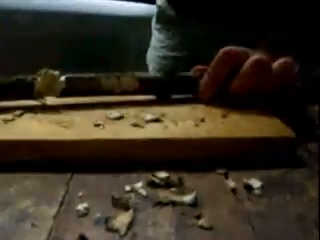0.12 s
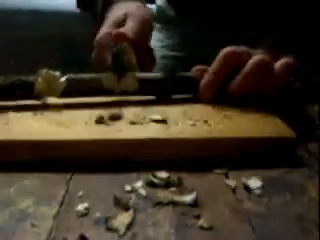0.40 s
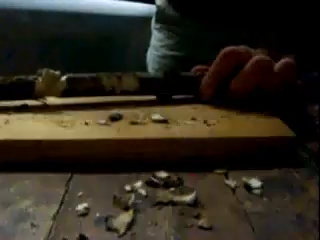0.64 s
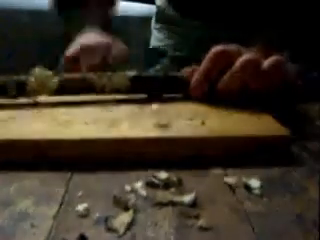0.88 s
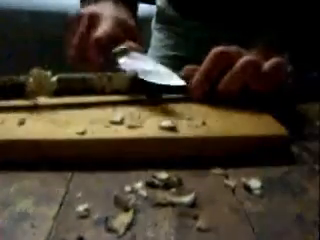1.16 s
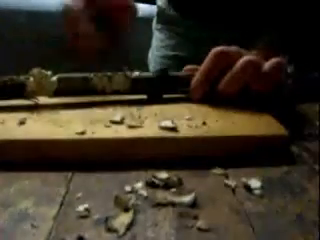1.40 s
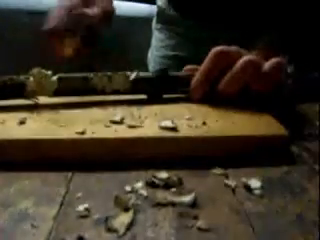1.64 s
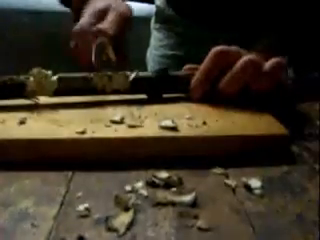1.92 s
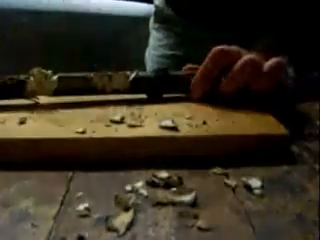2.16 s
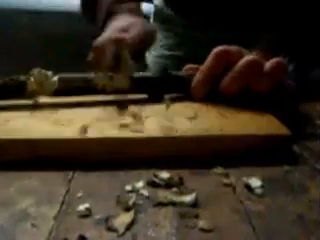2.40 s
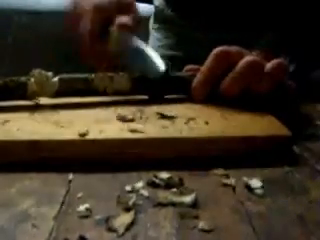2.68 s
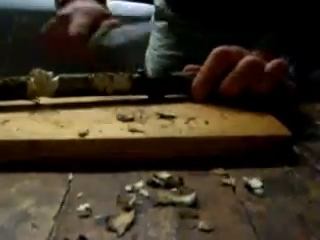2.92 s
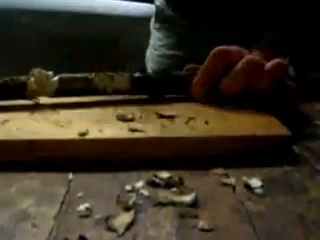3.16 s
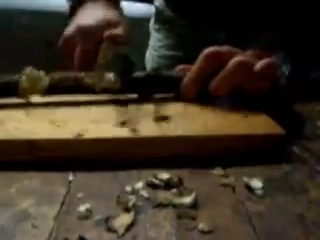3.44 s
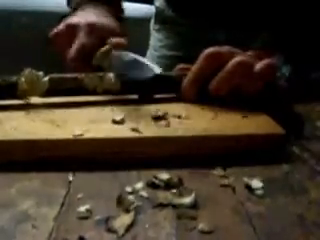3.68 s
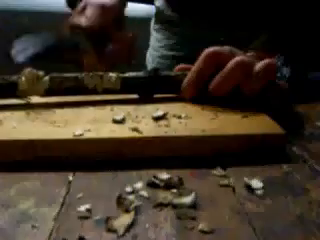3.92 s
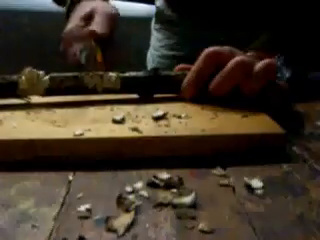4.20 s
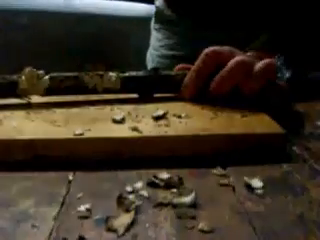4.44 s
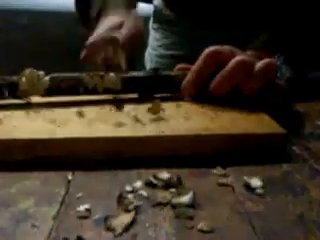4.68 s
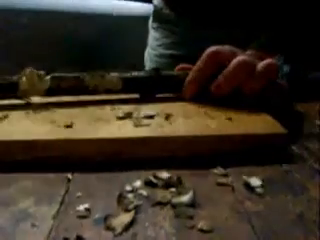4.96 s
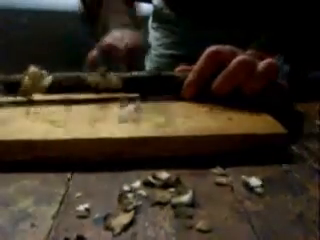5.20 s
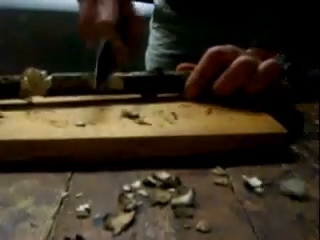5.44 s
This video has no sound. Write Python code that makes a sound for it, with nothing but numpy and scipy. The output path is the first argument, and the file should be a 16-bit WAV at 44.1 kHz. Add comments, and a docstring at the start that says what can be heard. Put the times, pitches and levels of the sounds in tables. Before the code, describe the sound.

Close to a small, cheap microphone in a bare echoing shed, a knife chops a branch held on a plank. Six hard blows crack, splinter, rattle and boom, distorting the input. Two come in the first second, then a pause, and the rest follow at uneven gaps. Lighter taps, rebounding wood and tiny chips fill in between, over hiss and soft low electrical bumps.

```python
"""In a bare, echoing shed, a knife chops into a branch held on a plank, close to a small camera.
Hard chops crack, rattle and boom, made of shaped noise and ringing wood; they overload the input.
Light taps, rebounds of the branch and landing chips follow: ringing wood with soft or bright noise.
The camera adds hiss with a faint tone, and short, low electrical dips, often a tenth of a second apart."""
import sys
import numpy as np
from scipy import signal
from scipy.fft import rfft, irfft, next_fast_len
from scipy.io import wavfile
from scipy.ndimage import map_coordinates

SR = 44100
rng = np.random.default_rng(int(sys.argv[2]) if len(sys.argv) > 2 else 0)


def materialize(psi):
    """Save the field psi as 16-bit PCM at rate SR to the path in sys.argv[1].

    A 1-D psi becomes a single channel; in a 2-D psi each row is a channel.
    """
    bounded = np.clip(np.atleast_2d(psi).T, -1, 1)
    quanta = np.round(bounded * 32767).astype(np.int16)
    wavfile.write(sys.argv[1], SR, quanta)


def elevation(decibels):
    """Turn decibel levels (scalar or array-like) into linear amplitude ratios."""
    levels = np.asarray(decibels, float)
    return 10 ** (levels / 20)


N = 246078  # length [samples]


def unit(x):
    """Scale to rms 1."""
    return x / np.sqrt(np.mean(x ** 2) + 1e-20)


def along(points, hz):
    """Read a value between (Hz, value) points on a log frequency axis."""
    f, v = np.transpose(points)
    return np.interp(np.log(hz + 1), np.log(f + 1), v)


def filtered(x, response):
    """Multiply the spectrum of x by a response, a function of frequency."""
    m = 2 * next_fast_len(len(x) // 2 + SR // 4)
    return irfft(rfft(x, m) * response(np.fft.rfftfreq(m, 1 / SR)), m)[:len(x)]


def causal(response):
    """Keep the same gains, with the phase that lets nothing come early."""
    def shaped(hz):
        cepstrum = irfft(np.log(np.maximum(response(hz), 1e-6)))
        half = len(cepstrum) // 2
        # fold the part before time zero onto the part after it
        cepstrum[1:half] *= 2
        cepstrum[half + 1:] = 0
        return np.exp(rfft(cepstrum, 2 * len(hz) - 2))
    return shaped


def add(track, s, sound):
    """Mix a sound in at s seconds; the track starts one second early."""
    part = track[round((s + 1) * SR):][:len(sound)]
    part += sound[:len(part)]


def chops():
    """The blade splits fibres with a crack, the branch rattles on the plank, the floorboards boom."""
    # hard chops: (time [s], crack level [dB], splinters above the crack [dB], thud level [dB],
    # time for the rattle to fade by 60 dB [s])
    hard_chops = [(-.33, 9.5, 0, 8, .17), (.3220, 10.5, 8.5, 6.5, .11), (0.9604, 11.5, 2.5, 8, .32),
                  (2.4414, 10.5, 3.5, 5, .12), (3.4668, 9.5, 5.5, 5, .13), (4.7250, 10, -10, 7, .15),
                  (5.2921, 11.5, 4.5, 6, .2)]
    # tone colour of splitting wood: (frequency [Hz], relative level [dB])
    crack_colour = [(59, -35.5), (100, -3.5), (415, -4.5), (495, -0.5), (956, 1), (1270, -1.5),
                    (2880, -0.5), (4650, -5), (5860, -12), (7000, -22.5), (9100, -63.5), (15400, -120)]
    push_s, push_db = 0.0011, 4.5
    splinter_hz, splinter_width_hz, splinter_t60_s = 5600, 1500, 0.053
    track, t = np.zeros(N + SR), np.arange(SR // 2) / SR
    colour = lambda hz: elevation(along(crack_colour, hz))
    splinter_colour = lambda hz: 1 / (1 + ((hz - splinter_hz) / splinter_width_hz) ** 2)
    for s, crack_db, splinter_db, thud_db, rattle_t60_s in hard_chops:
        plank_db = crack_db + 7
        # a single sharp snap, heard mostly through the room
        snap = filtered(t == 0, causal(colour))
        snap = elevation(crack_db + 31.5) * snap / np.linalg.norm(snap)
        add(track, s, shed(snap, near_db=-4.0, far_db=-20, direct_db=-21.5, hang=2))
        # tearing noise: a quick crack and a weaker, slower rattle
        noise = unit(filtered(rng.standard_normal(len(t)), colour))
        lumps = elevation(9.1 * map_coordinates(rng.standard_normal(70), [t * 130]))  # fibres give way unevenly
        fade = elevation(-60 * t / 0.022) + 0.2 * elevation(-60 * t / rattle_t60_s)
        add(track, s, elevation(crack_db) * lumps * noise * fade)
        # the blade's arrival: one short pressure push before the wood gives way
        add(track, s - push_s, elevation(push_db) * np.sin(np.pi * np.clip(t / push_s, 0, 1)))
        # the first fibres snap brightly
        bright = unit(filtered(rng.standard_normal(len(t)), splinter_colour))
        add(track, s, elevation(crack_db + splinter_db - 60 * t / splinter_t60_s) * bright)
        wood = elevation(plank_db) * ring(t, favoured_hz=600, damping=0.72, breadth=9.0)
        add(track, s, shed(wood, near_db=-6.5, far_db=-23, direct_db=-7, hang=2))
        for late, luck in rng.random((4, 2)):  # the branch jumps and slaps the plank again
            slap = ring(t, favoured_hz=250 + 500 * luck, damping=1.9, breadth=0.87)
            add(track, s + .008 + .07 * late, elevation(plank_db - 1.0 - 24 * late) * slap)
        # the floor: a strong thud that swells in, and a weak, long hum
        floor = boom(t)
        thud = elevation(thud_db - 60 * t / 0.14) * floor * (1 - np.exp(-t / 0.0092))
        hum = elevation(thud_db - 26.5 - 60 * t / 0.72) * floor
        add(track, s, thud + hum)
    return track[SR:]


def knocks():
    """Taps ring freely and nudge the floor; rebounds are choked and land in two touches."""
    # blade or hand taps the branch: (time [s], level [dB], favoured frequency [Hz], breadth [octaves])
    taps = [(.6388, 11, 800, 1.1), (.648, 0, 850, .8), (1.906, -11, 330, 1.24), (3.1137, 2.5, 494, 3.2),
            (3.123, -6, 600, 3.3), (3.914, -15, 517, 1.1), (3.928, -23, 600, 1.1), (3.943, -19, 460, 2),
            (3.997, -17, 336, 0.51), (4.190, -11, 413, 1.25), (4.2406, -13, 280, 1.23)]
    # the branch falls back on the plank: (time [s], level [dB], favoured frequency [Hz])
    rebounds = [(1.087, -2.2, 477), (1.107, -9, 290), (1.168, -4, 466), (1.230, -15, 430),
                (1.353, -20, 493), (1.467, -26, 600), (3.596, -3.5, 480), (3.673, -11, 446)]
    # the second touch: its far end lands just after and favours higher notes
    touches = [(0, 0, 1), (0.01, -4, 1.23)]  # (delay [s], level [dB], pitch factor)
    track, t = np.zeros(N + SR), np.arange(SR // 5) / SR
    for s, db, favoured_hz, breadth in taps:
        edge_db = -13.5 + 0.67 * db  # the noisy edge grows with the force
        add(track, s, contact(db, edge_db, favoured_hz, 1, breadth))
        nudge = elevation(db - 23 - 60 * t / 0.206) * boom(t)
        add(track, s, nudge * (1 - np.exp(-t / .006)))
    for s, db, favoured_hz in rebounds:
        for late, touch_db, brighter in touches:
            touch = contact(db + touch_db, -12.5, brighter * favoured_hz, damping=3.7, breadth=0.77)
            add(track, s + late, touch)
    return track[SR:]


def contact(db, edge_db, favoured_hz, damping, breadth):
    """A light contact rings the plank with a small edge of noise, both echoed by the shed."""
    t = np.arange(SR // 5) / SR
    wood = ring(t, favoured_hz, damping, breadth)
    edge_colour = lambda hz: hz / (hz + 900) / (1 + (hz / 2300) ** 2.9)
    noise = unit(filtered(rng.standard_normal(len(t)), edge_colour))
    fade = elevation(-60 * t / 0.042) + 0.037 * elevation(-60 * t / 0.33)
    edge = elevation(edge_db) * noise * fade * (1 - np.exp(-t / 0.00079))
    heard = shed(wood, near_db=-10.5, far_db=-31.5, direct_db=1.5, hang=0.86)
    # -1 is the very start of what is heard, see add()
    add(heard, -1, shed(edge, near_db=-8.5, far_db=-24.5, direct_db=2.0, hang=0.98))
    return elevation(db) * heard


def chips():
    """Each dry chip is a short bright tick of noise and a faint knock on the plank."""
    # chips landing: (time [s], level [dB])
    landings = [(1.092, -17), (1.1765, -20), (1.202, -32), (1.2396, -32), (1.353, -33.5), (1.382, -35),
                (1.4627, -30), (2.7030, -17), (3.1345, -22), (3.142, -42), (3.606, -18), (3.6394, -29.5),
                (3.684, -29.5), (3.7778, -29), (5.449, -18.5), (5.5443, -16.5)]
    track, t = np.zeros(N + SR), np.arange(SR // 10) / SR
    for s, db in landings:
        pitch_hz = 5500 * (1 + 0.036 * rng.standard_normal())  # each chip has its own pitch
        body = lambda hz: 0.3 + 1 / (1 + ((hz - pitch_hz) / 700) ** 2)
        tick_colour = lambda hz: body(hz) * hz / (hz + 900) / (1 + (hz / 6900) ** 12)
        tick = unit(filtered(rng.standard_normal(len(t)), tick_colour))
        add(track, s, elevation(db - 60 * t / 0.007) * tick)
        knock = ring(t, favoured_hz=800, damping=1.2, breadth=0.54)
        add(track, s + 0.00268, elevation(db - 2) * knock)
    return track[SR:]


def ring(t, favoured_hz, damping, breadth):
    """One blow sounds all modes at new strengths and phases, most of all those near favoured_hz."""
    # modes of branch and plank, before scatter and damping:
    # (frequency [Hz], relative level [dB], time to fade by 60 dB [s])
    modes = [(205, -8, .06), (250, -4, .06), (295, -6, .07), (345, -8, .05), (395, -7, .07),
             (470, -3, .055), (570, -6, .06), (660, -6, .04), (750, -5, .06), (870, -6, .045),
             (980, -7, .05), (1100, -8, .05), (1250, -8, .035), (1400, -10, .03), (1540, -9, .035),
             (1850, -10, .028), (2300, -11, .025)]
    hz, db, t60 = np.transpose(modes)[:, :, None]
    chance = rng.standard_normal((3, len(modes), 1))
    octaves_off = np.log2(hz / favoured_hz)
    favour = 1 / (1 + (octaves_off / breadth) ** 2) ** 1.4
    size = elevation(db + 0.94 * chance[0] - 60 * t * damping / t60) * favour
    turn = 2 * np.pi * hz * (1 + 0.028 * chance[1]) * t + 1.19 * chance[2]
    wood = (size * np.sin(turn)).sum(0)
    wood = wood * (1 - np.exp(-t / .001)) ** 2  # the contact takes a moment to build
    return 0.28 * wood / np.sqrt(np.mean(wood[:SR // 100] ** 2))  # level set on the first 10 ms


def boom(t):
    """Noise in the resonances of the floorboards."""
    # floorboards under the plank: (frequency [Hz], width [Hz], relative level [dB])
    boards = [(46.4, 20, -10), (111.8, 8.2, 3.5), (196.9, 22, -15.5), (248, 76, -2.5)]
    colour = lambda hz: sum(elevation(db) / (1 + ((hz - centre) / width) ** 2) for centre, width, db in boards)
    return unit(filtered(rng.standard_normal(len(t)), colour))


def shed(sound, near_db, far_db, direct_db, hang):
    """The direct sound, the quick answer of the near walls and the shed's long hang (hang seconds)."""
    # near walls: (frequency [Hz], time to fade by 60 dB [s])
    near_decay = [(100, 0.16), (500, 0.22), (2000, 0.28), (5000, 0.28), (7500, 0.29)]
    # whole shed: (frequency [Hz], time to fade by 60 dB [s])
    far_decay = [(100, 1.8), (500, 1.285), (1000, 1.34), (2500, 1.28), (4300, 1.02), (5800, 0.96),
                 (7500, 0.95)]
    # tone colour of the whole shed: (frequency [Hz], gain [dB])
    far_colour = [(100, -11), (400, -1.5), (1000, -5.5), (2500, -3), (4300, -4), (5800, -3), (7500, -11)]
    answer = elevation(far_db) * filtered(tail(far_decay, hang), lambda hz: elevation(along(far_colour, hz)))
    near = tail(near_decay, .5)
    answer[100:100 + len(near)] += elevation(near_db) * near  # 100 samples late
    answer[0] += elevation(direct_db)
    return signal.fftconvolve(sound, answer)


def tail(decay, seconds):
    """A fresh room answer of energy 1, made of noise; each frequency dies at its own speed."""
    hz, t, z = signal.stft(rng.standard_normal(round(seconds * SR)), SR, nperseg=256)
    fade = elevation(-60 * t / along(decay, hz)[:, None])
    answer = signal.istft(z * fade, SR, nperseg=256)[1]
    return answer / np.linalg.norm(answer)


def dips():
    """A rounded negative pulse of a few ms, then a small overshoot that drains through the coupling."""
    # electrical dips: time of the deepest point [s]
    full_dips = [.115, .196, .315, .769, .913, 1.233, 1.336, 1.443, 1.530, 1.640, 1.735, 1.833, 2.003,
                 2.138, 2.292, 2.434, 2.771, 2.876, 2.965, 3.065, 3.203, 3.371, 3.768, 3.867, 3.971, 4.072,
                 4.163, 4.348, 4.439, 4.608, 4.932, 5.111, 5.198, 5.565]
    # weaker dips beside a full one: time of the deepest point [s]
    twin_dips = [.190, 1.645, 2.762, 4.433]
    track, t = np.zeros(N + SR), np.arange(SR // 5) / SR
    half = .003  # from the start to the deepest point [s]
    pulse = -np.clip(1 - np.abs(t / half - 1), 0, 1) ** 0.87
    pulse += .14 * np.clip((t / half - 2), 0, 1) * np.exp(-t / 0.028)
    for s, less_db in [(s, 0) for s in full_dips] + [(s, -4.5) for s in twin_dips]:
        depth_db = -25.5 + less_db + 1.1 * rng.standard_normal()
        add(track, s - half, elevation(depth_db) * pulse)
    return track[SR:]


def hiss():
    """Room and circuit noise with one faint steady tone."""
    # tone colour of the hiss: (frequency [Hz], relative level [dB])
    hiss_colour = [(12, -9.5), (20, 4.5), (301, -4), (377, -3.5), (815, -8.5), (878, -4), (1100, -10.5),
                   (1340, -11.5), (3540, -17), (4430, -17), (5140, -22.5), (6430, -21.5), (7650, -50),
                   (9940, -68), (16800, -120)]
    # the steady tone, ahead of the microphone port: frequency [Hz], level [dB]
    whine_hz, whine_db = (4291, -76.5)
    noise = unit(filtered(rng.standard_normal(N), lambda hz: elevation(along(hiss_colour, hz))))
    whine = np.sin(2 * np.pi * whine_hz * np.arange(N) / SR)
    return elevation(-48) * noise + elevation(whine_db) * whine


def scene():
    """Everything reaches one microphone through its port; the dips arise behind it."""
    # peaks and dip of the microphone port: (frequency [Hz], width [Hz], gain change [factor added to 1])
    port_bumps = [(2350, 61, 0.35), (2970, 95, 0.33), (4705, 150, -0.93), (4980, 250, 0.3),
                  (6020, 130, 0.25)]
    port = lambda hz: 1 + sum(change / (1 + ((hz - centre) / width) ** 2)
                              for centre, width, change in port_bumps)
    sounds = chops() + knocks() + chips() + hiss()
    return (filtered(sounds, causal(port)) + dips())[None]


def low_pass(x):
    """Removes everything above the highest recorded frequency."""
    return signal.sosfilt(signal.butter(12, 15900, fs=SR, output="sos"), x)


def record(dry):
    """The input clips, then everything above a narrow band is cut away; a second clip spills treble above that
    band."""
    first_limit, second_limit = 0.95, .975  # of full scale
    rolled = filtered(dry[0], causal(lambda hz: 1 / np.sqrt(1 + (hz / 7100) ** 12)))
    clipped = np.clip(rolled, -first_limit, first_limit)
    # a slope down from 7100 Hz, then nothing from 7950 Hz up
    band_edge = lambda hz: np.clip((8300 - hz) / 1200, 0, 1) ** 2.1 * (hz < 7950)
    narrow = filtered(clipped, band_edge)
    full = np.clip(narrow, -second_limit, second_limit)  # what still overshoots clips again
    return low_pass(full[None])


dry = scene()
out = record(dry)
materialize(out)
```